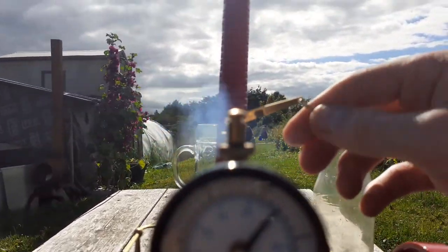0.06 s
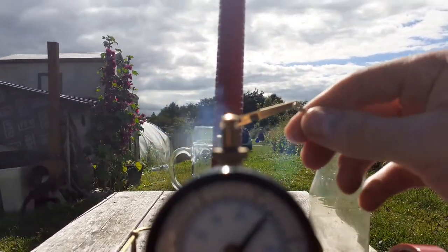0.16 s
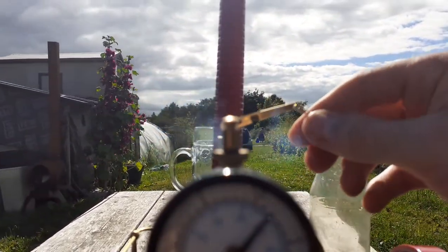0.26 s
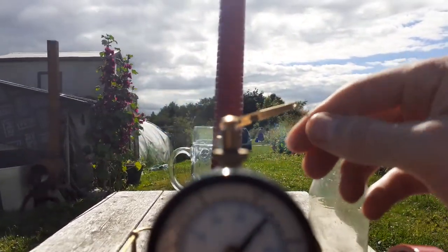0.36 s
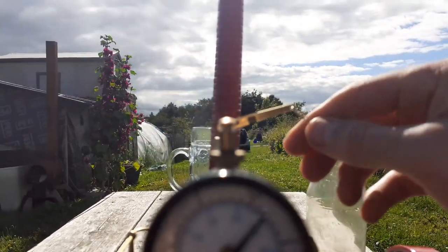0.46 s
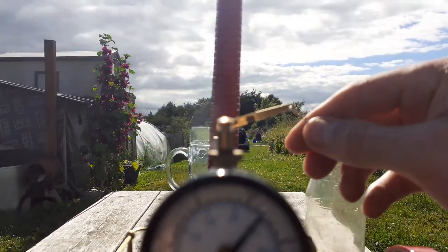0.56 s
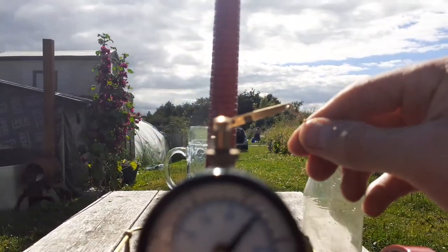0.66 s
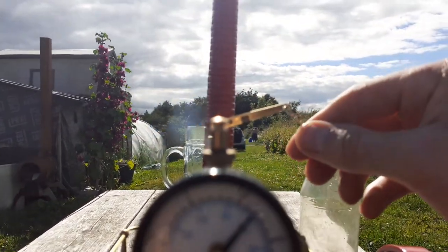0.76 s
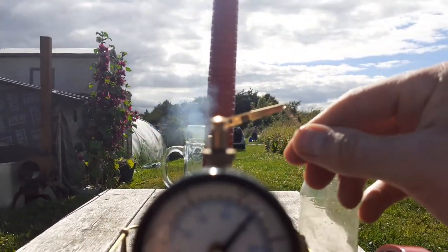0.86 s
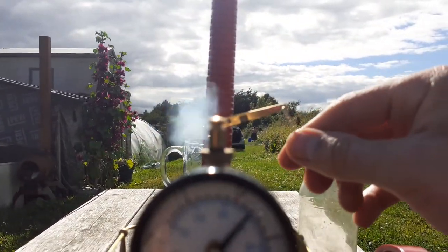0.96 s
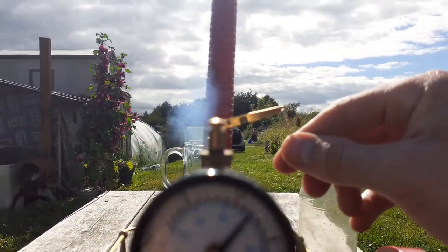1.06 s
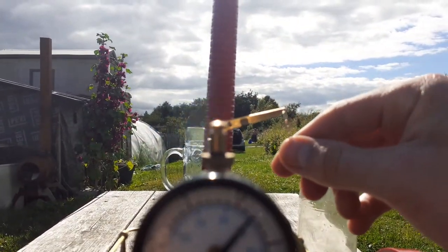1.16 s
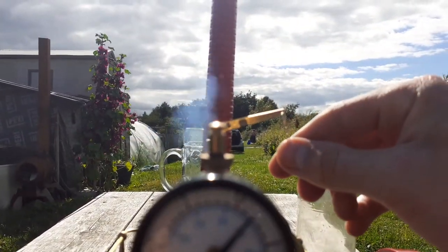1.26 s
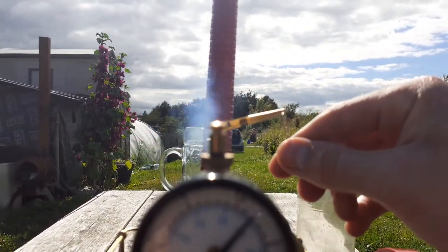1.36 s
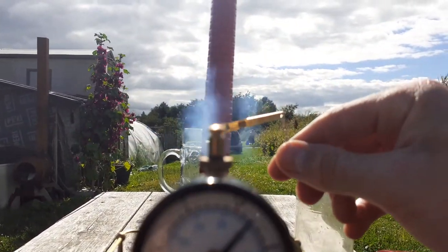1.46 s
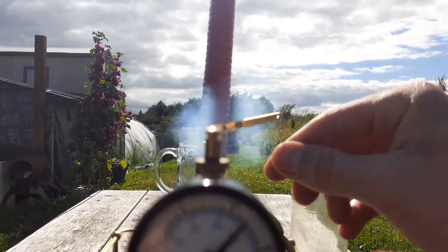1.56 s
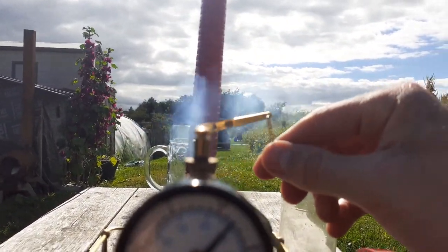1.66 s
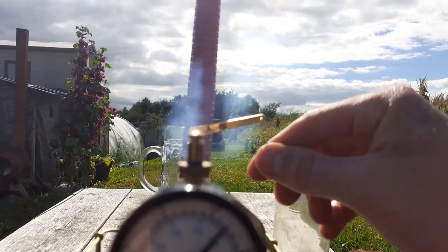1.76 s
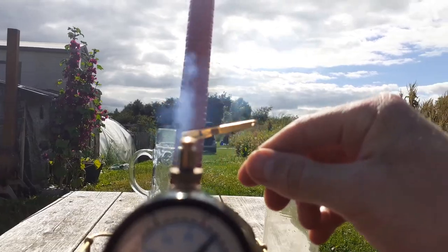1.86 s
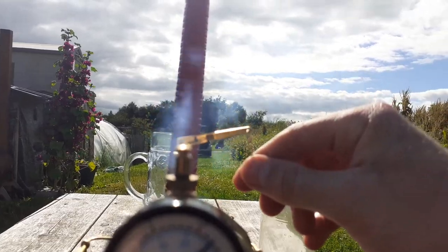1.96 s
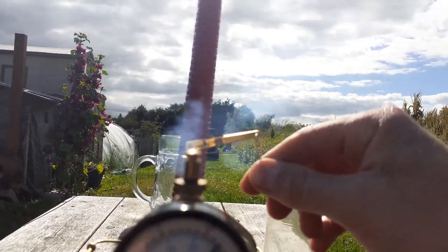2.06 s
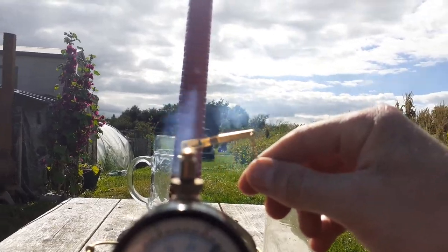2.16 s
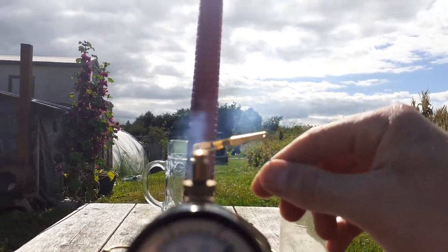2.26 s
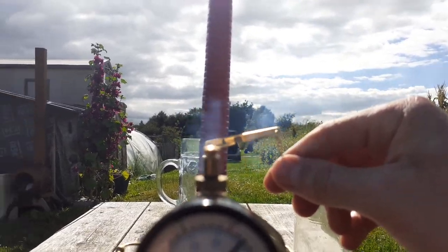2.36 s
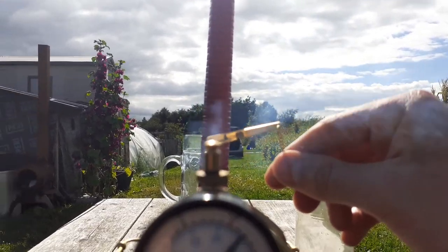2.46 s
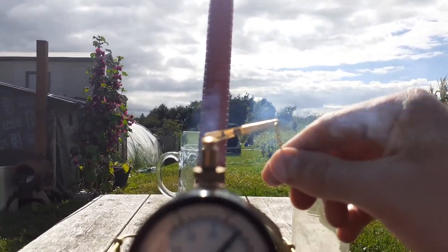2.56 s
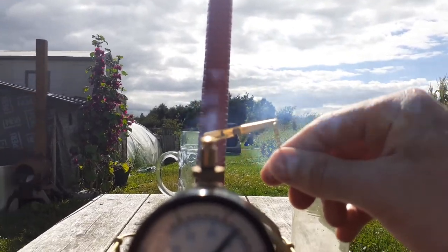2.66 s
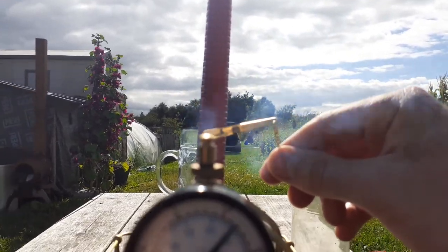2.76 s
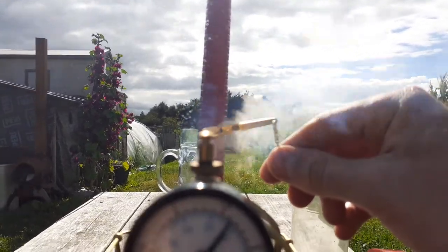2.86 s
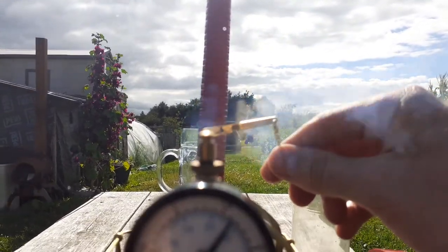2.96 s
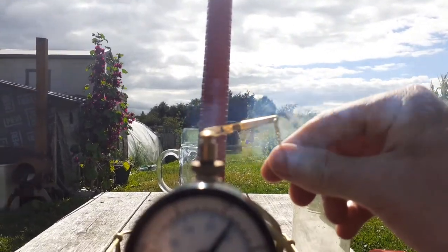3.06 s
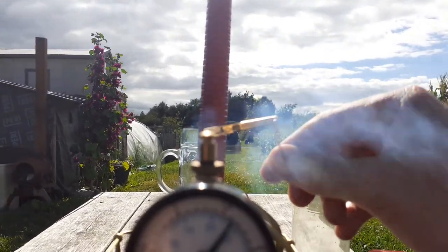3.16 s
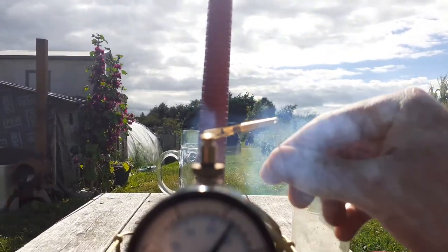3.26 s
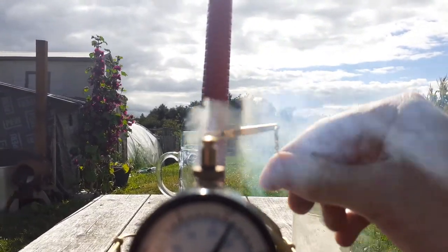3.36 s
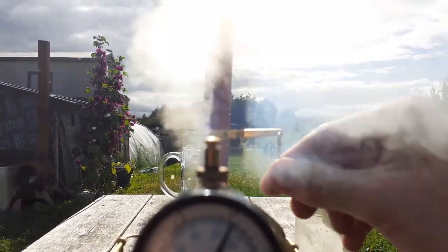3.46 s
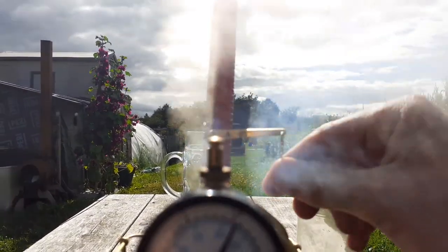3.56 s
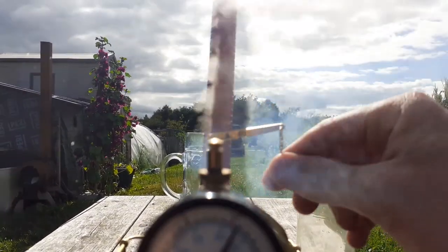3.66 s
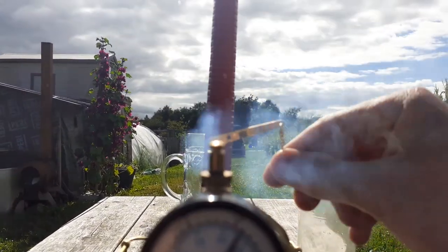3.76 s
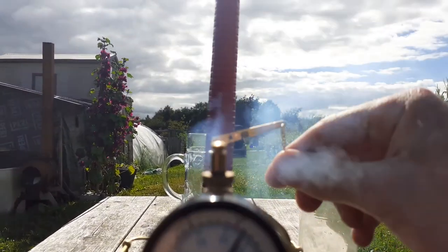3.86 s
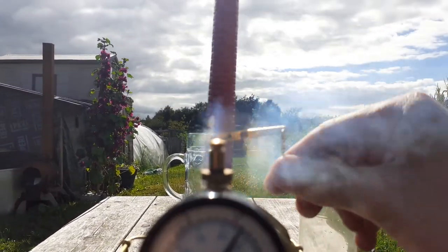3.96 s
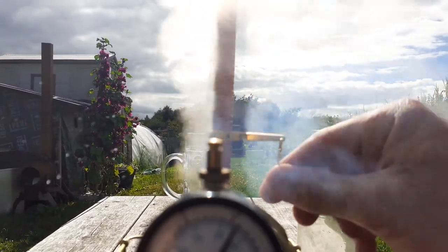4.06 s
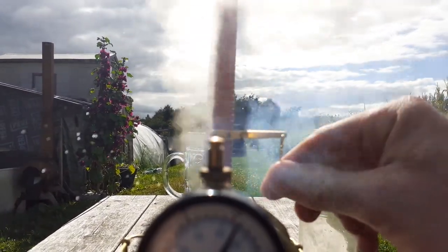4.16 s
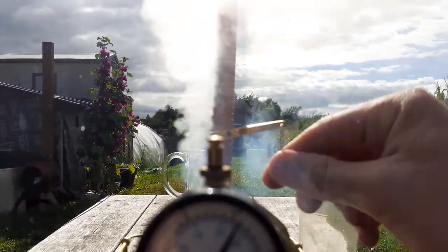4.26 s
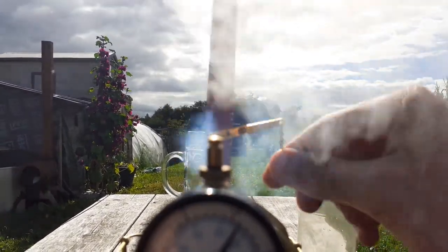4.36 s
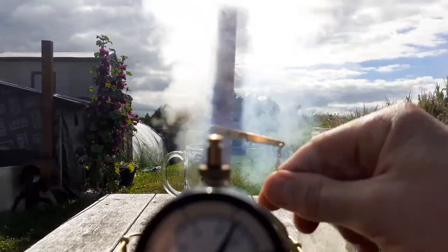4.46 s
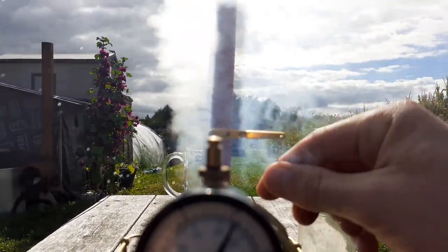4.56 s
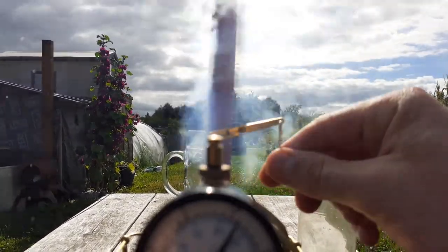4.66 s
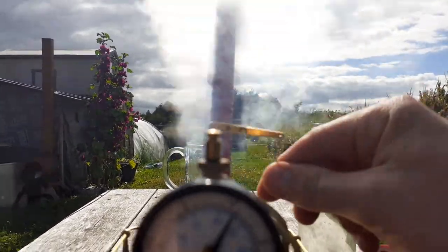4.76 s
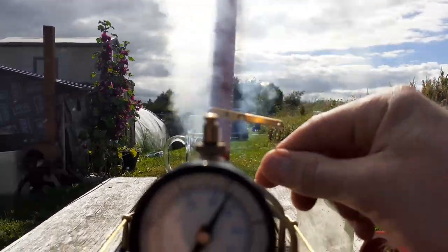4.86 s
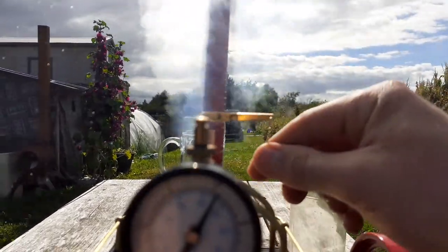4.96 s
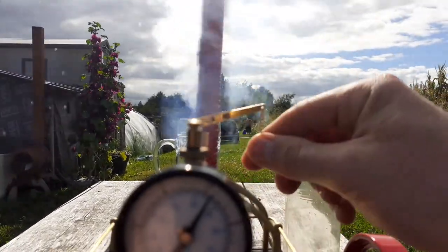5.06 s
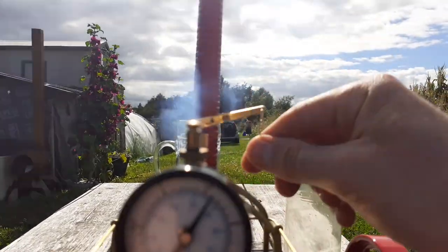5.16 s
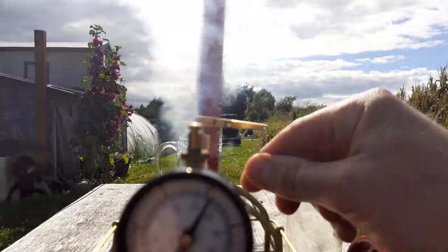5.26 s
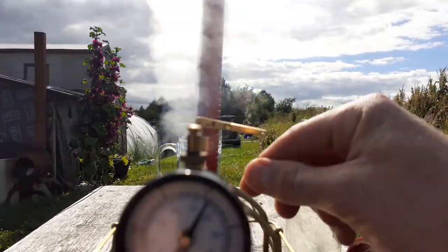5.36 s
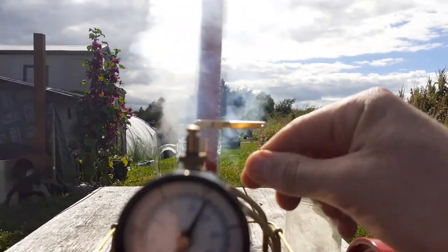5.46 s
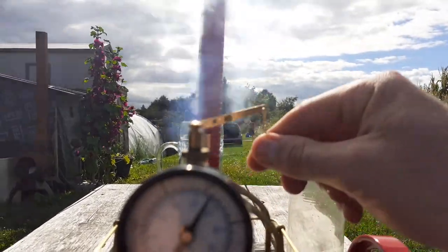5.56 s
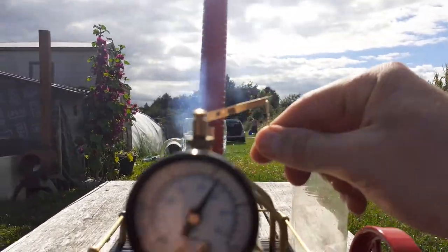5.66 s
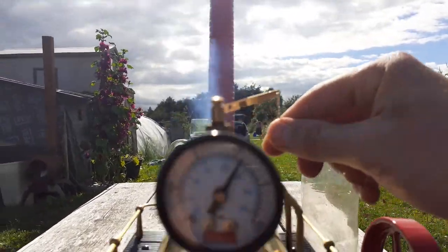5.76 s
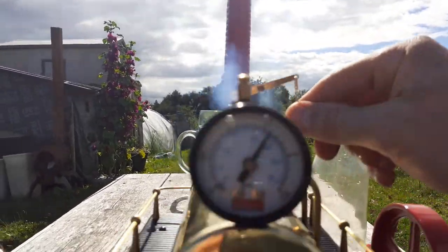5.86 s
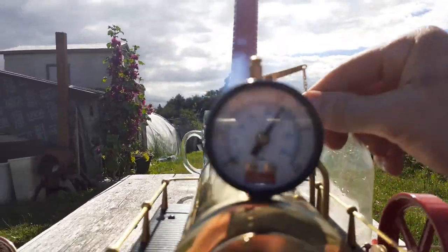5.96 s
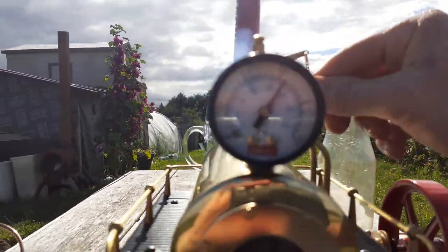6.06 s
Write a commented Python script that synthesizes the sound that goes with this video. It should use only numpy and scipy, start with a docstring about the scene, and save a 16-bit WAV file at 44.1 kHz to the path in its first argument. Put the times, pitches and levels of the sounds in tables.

```python
"""A small brass steam whistle on a model boiler in a garden, an arm's length from a phone, a little to its left.
From the start a hand rattles the valve chain (struck modes), a leak hisses (coloured noise) and a faint hum
drifts (two sines); then low gusts (slow noise) buffet mostly the left port and the valve spits wet steam (noise).
Five toots (sines with overtones) rise to pitch and sag again, each with jet hiss and a draught on the left port;
from the first toot on, leak, hum and chain are heard much lower."""
import sys
import numpy as np
from scipy import signal
from scipy.fft import rfft, irfft, next_fast_len
from scipy.io import wavfile
from scipy.ndimage import uniform_filter1d, map_coordinates

SR = 44100
rng = np.random.default_rng(int(sys.argv[2]) if len(sys.argv) > 2 else 0)


def to_wav(s):
    """Save 16-bit WAV."""
    ch = np.atleast_2d(s).T  # columns
    pcm = np.round(np.clip(ch, -1, 1) * 32767)  # PCM
    wavfile.write(sys.argv[1], SR, pcm.astype(np.int16))


def invert_db(level):
    """Linear amplitude ratio for a level in decibels (20 dB per decade), elementwise."""
    return 10 ** (np.asarray(level, dtype=float) / 20)


N = 269892


def column(table, k):
    """Linear interpolation: column k of a time curve at every sample."""
    rows = np.array(table, float)
    return np.interp(np.arange(N) / SR, rows[:, 0], rows[:, k])


def gate(start, end, fade_s=0.0027):
    """Trapezoidal envelope: rises from 0 at start and returns to 0 at end over fade_s."""
    t = np.arange(N) / SR
    return np.clip(np.minimum(t - start, end - t) / fade_s, 0, 1)


def at_hz(table, hz):
    """Logarithmic frequency scale: a (frequency, value) table is interpolated along it."""
    rows = np.array(table, float)
    return np.interp(np.log(hz + 1), np.log(rows[:, 0] + 1), rows[:, 1])


def walk(rate):
    """Low-passed randomness: levels held 1 / rate s and slewed twice; spread near 1."""
    held = max(int(SR / rate), 1)
    steps = np.repeat(rng.standard_normal(N // held + 1), held)
    return 1.81 * uniform_filter1d(uniform_filter1d(steps, held), held)[:N]


def pan(db):
    """Interaural level difference: left and right gains for left minus right in dB."""
    return invert_db(np.array([db, -db]) / 2)


def noise(spectrum, pan_db, alike, flicker_db, rate, lo_hz, hi_hz, lead=((0, 0), (1, 0))):
    """Filtered noise of partial coherence; octaves flicker alone. Before that, mean of sides has rms 1 in band."""
    size = next_fast_len(N)
    hz = np.arange(size // 2 + 1) * SR / size
    common, own = rfft(rng.standard_normal((2, size)), axis=1)
    alike = np.clip(alike, 0, 1)
    right = alike * common + np.sqrt(1 - alike ** 2) * own
    right = right * np.exp(-1j * at_hz(lead, hz))
    pair = np.array([common, right]) * invert_db(at_hz(spectrum, hz)) * pan(at_hz(pan_db, hz))
    inside = (hz > lo_hz) & (hz < hi_hz)
    pair = pair / np.sqrt(2 * np.sum(np.abs(pair.mean(0)[inside]) ** 2)) * size
    power = np.abs(pair[0]) ** 2
    out = np.zeros((2, N))
    for octave in range(5, 15):
        share = np.clip(1 - np.abs(np.log2(hz + 1) - octave), 0, 1)
        # octaves with next to no power are skipped
        if np.sum(share * power) > 1e-5 * np.sum(power):
            out += irfft(pair * share, size)[:, :N] * invert_db(flicker_db * walk(rate))
    return out


def ring(x, hz, t60):
    """Damped resonance: one mode excited by x, losing 60 dB in t60 seconds."""
    pole = np.exp(2j * np.pi * hz / SR - np.log(1000) / (t60 * SR))
    return signal.lfilter([1], [1, -pole], x).imag * np.sqrt(1 - abs(pole) ** 2)


def flow(opens, shuts, stroke_ms):
    """Blowing pressure sets pitch: its fractional sag while the valve opens and while it shuts."""
    t = np.arange(N) / SR
    stroke_s = stroke_ms / 1000
    opening = 0.33 * np.exp(np.clip((opens - t) / stroke_s, -50, 1))
    shutting = 0.27 * np.exp(np.clip((t - shuts) / stroke_s, -50, 1))
    return opening, shutting


# the valve's toots: open_s, shut_s, lever_stroke_ms, left_minus_right_db, port_draught_db
VALVE_TOOTS = [(3.425, 3.737, 25.2, 7.5, -49.5), (4.027, 4.332, 22.4, 6, -41.5),
               (4.464, 4.685, 11.4, 5, -37.5), (4.769, 5.104, 14, 5, -42), (5.258, 5.596, 12.7, 7, -40.5)]
# the tone at full pressure; waver and roughness are added to it: time_s, pitch_hz, level_db
TONE_CURVE = [(3.455, 4165, -11.5), (3.58, 4156, -13), (3.65, 4166, -13), (3.71, 4165, -15),
              (4.061, 4301, -11), (4.102, 4326, -10), (4.16, 4319, -12), (4.245, 4290, -11),
              (4.307, 4327, -12), (4.493, 4350, -11), (4.56, 4324, -14.5), (4.618, 4354, -14),
              (4.66, 4342, -11), (4.798, 4385, -10), (4.84, 4365, -12), (4.857, 4420, -12.5),
              (4.879, 4360, -14), (4.925, 4334, -14), (5.001, 4402, -11), (5.06, 4367, -11.5),
              (5.29, 4354, -14), (5.411, 4327, -16), (5.451, 4355, -15), (5.55, 4358, -14.5)]
# water drops choke the pipe: time_s, depth_db, length_ms
WATER_CHOKES = [(3.453, 10.5, 4), (3.507, 6, 4), (4.172, 22, 12), (4.862, 3.5, 1.7), (4.902, 12, 4.8),
                (5.382, 12, 6.4)]
# overtones at full pressure in calm draught: multiple, level_re_tone_db, left_lead_rad
OVERTONE_SERIES = [(2, -31.5, .1), (3, -16.5, 2.5)]
LOSS_DB, WET_LOSS_DB = 78, -1  # tone lost per unit of sag while opening; wet: steam already spits
LEAD_RAD, LEAD_RAD_PER_DB = .6, .165  # the further left the tone, the more the left leads
# the harder the draught above calm, the weaker each overtone
CALM_DB, BLUR_DB_PER_DB = -49.5, (0.9, 0.13)


def whistle():
    """Jet-driven pipe resonance: pitch follows pressure, turbulence roughens it, drops choke it."""
    t = np.arange(N) / SR
    choke_db = sum(depth * np.exp(-np.abs((t - s) / (ms / 2000)) ** 4) for s, depth, ms in WATER_CHOKES)
    rough = invert_db(.4 * walk(65) + 0.457 * walk(350) + .5 * walk(1200) - choke_db)
    choke_drop = .0004 * choke_db ** 2 * (1 + .5 * walk(400))  # a choked pipe drops in pitch
    waver = 1 + .0014 * walk(90) + 0.0025 * walk(500) - choke_drop
    out = np.zeros((2, N))
    for opens, shuts, stroke_ms, pan_db, draught_db in VALVE_TOOTS:
        opening, shutting = flow(opens, shuts, stroke_ms)
        sag = opening + shutting
        toot = [row for row in TONE_CURVE if opens < row[0] < shuts]
        phase = 2 * np.pi * np.cumsum(column(toot, 1) * (1 - sag) * waver) / SR
        lead = LEAD_RAD + LEAD_RAD_PER_DB * pan_db
        sides = pan(pan_db + .7 * walk(18) + 15 * sag)
        # the mean of the two sides keeps the tone's level
        sides = sides / np.abs(sides[0] + sides[1] * np.exp(1j * lead)) * 2
        loss_db = WET_LOSS_DB if opens < WET_SPIT[-1][0] else LOSS_DB
        # the tone weakens with pressure and dies quickly once the jet loses its grip on the pipe
        db = column(toot, 2) - loss_db * opening - 70 * shutting - 110 * np.maximum(sag - .17, 0)
        size = np.sqrt(2) * invert_db(db) * gate(opens + 0.0017, shuts + 0.0071, 0.0049) * rough
        tone = np.sin([phase, phase - lead])
        for (multiple, over_db, lag), blur in zip(OVERTONE_SERIES, BLUR_DB_PER_DB):
            # overtones need full pressure and fade first as it sags
            level_db = over_db - 32 * sag - blur * (draught_db - CALM_DB) + 1.5 * walk(25)
            tone += invert_db(level_db) * np.sin([multiple * phase, multiple * phase - lag])
        out += sides * size * tone
    return out


# wet steam around the valve's first opening: time_s, pipe_breath_db, jet_hiss_db
WET_SPIT = [(2.841, -70, -53), (2.86, -30, -28), (2.89, -32, -34.5), (3.04, -34, -42), (3.07, -45, -46),
            (3.37, -45.5, -47.5), (3.425, -32, -33), (3.5, -43, -50.5), (3.56, -60.5, -61)]
# the pipe blown without speaking: frequency_hz, density_db_per_hz
BREATH_SPECTRUM = [(1500, -29.5), (2600, -21), (3400, -10.5), (4400, -4), (4900, -3.5), (5500, -19),
                   (7000, -71)]
# the pipe nearly speaking: time_s, pitch_hz
MUTTER_PITCH = [(2.9, 4700), (3.05, 4230), (3.1, 4326), (3.42, 4420)]
# a slug of water clears the valve: start_s, length_s, level_db
WATER_PUFF = (2.842, 0.056, -20)
# sound of that slug: frequency_hz, density_db_per_hz
SLUG_SPECTRUM = [(590, -25), (1000, -16), (1970, -17), (2150, -16), (4330, 2), (6200, -28), (8060, -55),
                 (13600, -120)]
# hiss at the valve lip: frequency_hz, density_db_per_hz
JET_SPECTRUM = [(3650, -53), (6200, -7.5), (6600, -7), (7470, 1.5), (9260, -13.5), (10200, -5.5),
                (12100, 1.5), (14000, -2), (15200, -3), (16000, -3.5)]
# phase of the steam between the sides: frequency_hz, left_lead_rad
STEAM_LEAD = [(0, -6), (4400, 1.72), (6500, 5), (10000, 5), (14100, 10.5), (16000, 16)]
# the draught on the port: frequency_hz, density_db_per_hz
DRAUGHT_SPECTRUM = [(24, -47.5), (75, -2), (242, -3), (336, -2.5), (450, -2), (550, -2), (3100, -5.5),
                    (4030, -39), (6820, -120)]
JET_DB = -39  # hiss at the lip at full flow
FULL_FLOW_HZ, FULL_FLOW_DB = (12000, 14800), -3  # the jet is brighter in this band during toots
DRAUGHT_STROKES = 4.82  # the draught builds and dies over this many lever strokes


def steam():
    """Turbulent jet noise: steam hisses at the lip, blows across the pipe and shakes the left port."""
    spit_end = WET_SPIT[-1][0]
    spit = gate(WET_SPIT[0][0], spit_end)
    breath, hiss = invert_db(column(WET_SPIT, 1)) * spit, invert_db(column(WET_SPIT, 2)) * spit
    draught, full = 0, 0
    # the pipe nearly speaks: a narrow unsteady band that slides in pitch
    carrier = np.exp(2j * np.pi * np.cumsum(column(MUTTER_PITCH, 1)) / SR)
    mutter = carrier * (walk(380) + 1j * walk(380))
    mutter = np.array([mutter, mutter * np.exp(-1.7j)]).real
    mutter = invert_db(-2.5) * breath * pan(5.7)[:, None] * mutter
    for opens, shuts, stroke_ms, _, draught_db in VALVE_TOOTS:
        sag = sum(flow(opens, shuts, stroke_ms))
        jet = invert_db(JET_DB - 16.6 * np.sqrt(sag)) * gate(opens - .022, shuts + 0.023, .016)
        hiss, breath, full = hiss + jet, breath + invert_db(4.0) * jet, full + invert_db(FULL_FLOW_DB) * jet
        # where steam already spits, the draught starts earlier
        starts = opens if opens > spit_end else opens - .1
        blow = gate(starts, shuts + 0.0067, DRAUGHT_STROKES * stroke_ms / 1000) ** 1.59
        draught = draught + invert_db(draught_db) * blow
    s, length, puff_db = WATER_PUFF
    puff = invert_db(puff_db) * gate(s, s + length, 0.024)
    lip = noise(JET_SPECTRUM, [(6000, 1.0), (15000, 7.9)], 0.593, 1.4, 40, 13660, 16220, STEAM_LEAD)
    bright = signal.sosfilt(signal.butter(2, FULL_FLOW_HZ, "bandpass", fs=SR, output="sos"), lip)
    pipe = noise(BREATH_SPECTRUM, [(1500, 7.1), (5000, 4.2)], 0.37, 2.7, 60, 2500, 5800, STEAM_LEAD)
    slug = noise(SLUG_SPECTRUM, [(1500, 8.3), (5000, 4.9)], 1.0, 0.7, 150, 2500, 5800, STEAM_LEAD)
    buffet = noise(DRAUGHT_SPECTRUM, [(100, 19), (700, 25.4), (2400, 23)], .15, 0.84, 40, 150, 2200)
    buffet = invert_db(2.38 * walk(60) + 0.45 * walk(13)) * buffet
    return mutter + hiss * lip + full * bright + breath * pipe + puff * slug + draught * buffet


HUSH_DB, HUSH_S = -16, 0.095


def hush():
    """Gain ramp in decibels: the faint sounds sink as the first toot begins and stay down."""
    since = np.arange(N) / SR - VALVE_TOOTS[0][0]
    return invert_db(HUSH_DB * np.clip(since / HUSH_S, 0, 1))


# chain and lever knocks, early and around the toots; hush() lowers the later ones from these levels:
# start_s, body_peak_db, brightness_db
CHAIN_KNOCKS = [(0.065, -23, -2), (0.151, -16.5, -21), (0.185, -24.5, -11), (0.258, -17, -2),
                (.36, -32, -7), (.628, -36.5, -7), (.945, -41, -12), (1.045, -34, -7), (1.119, -24, -13),
                (1.185, -19, -2.5), (1.511, -35, -7), (1.72, -26.5, -10), (1.764, -33.5, -9),
                (2.057, -31.5, -16), (2.286, -23.5, -14), (2.464, -32.5, -20), (2.508, -22.5, -1.5),
                (2.606, -20.5, -16), (2.629, -21.5, -17), (2.728, -20, -2), (3.653, -15, -21),
                (4.692, -21, -25), (5.113, -18.5, -23), (5.147, -19.5, -20), (5.227, -20, -4.5),
                (5.85, -33.5, -8)]
# modes of the boiler fittings: frequency_hz, gain_db, t60_s
FITTING_MODES = [(745, -3.5, 0.036), (950.5, -0.5, 0.0513), (1099, -3, 0.15), (1298, 1.5, 0.068),
                 (1650, -7.5, 0.033), (1735, 1, 0.05), (1852, -4.5, 0.056), (2320, -14.5, 0.14),
                 (2715, 7, 0.029), (3290, 10.5, 0.043), (4100, 5.5, .018), (4700, 9, 0.014),
                 (7080, 9.5, 0.0029), (15100, -18, .004)]
SCRAPE_RISE_S, SCRAPE_FALL_S = 1.42 / 1000, 13.9 / 1000
# faint ticks of single links fall at random while the hand plays with the chain
TICKS, TICKS_END_S = 45, 2.8
TICK_DB, TICK_SPREAD_DB, TICK_BRIGHT_DB = -40, 2.24, -22  # the softest tick; exponential spread above it
SPLIT_HZ = 2400  # modes below make the body of a knock, the others its edge


def chain():
    """Modal excitation: gritty scrapes are heard directly and through fittings struck by luck."""
    out, length = np.zeros((2, N + 8192)), 3600
    t = np.arange(length) / SR
    body = signal.butter(2, [700, 2600], "bandpass", fs=SR, output="sos")
    edge = signal.butter(1, [2500, 7500], "bandpass", fs=SR, output="sos")
    cut = signal.butter(3, 600, "highpass", fs=SR, output="sos")
    push = np.clip(t / SCRAPE_RISE_S, 0, 1) ** 2
    push = push * np.exp(-(np.maximum(t - SCRAPE_RISE_S, 0) / SCRAPE_FALL_S) ** 2)
    ticks = [(a * TICKS_END_S, TICK_DB - TICK_SPREAD_DB * np.log(1 - b), TICK_BRIGHT_DB)
             for a, b in rng.random((TICKS, 2))]
    for s, db, bright_db in CHAIN_KNOCKS + ticks:
        grit = rng.standard_normal((2, length))
        # the right side hears a little of the left, six samples later
        scrape = push * np.array([grit[0], 0.37 * np.roll(grit[0], 6) + 1.16 * grit[1]])
        luck = 3.0 * rng.standard_normal(len(FITTING_MODES))
        low, high = 0, 0
        for (hz, gain_db, t60), luck_db in zip(FITTING_MODES, luck):
            mode = invert_db(gain_db + luck_db) * ring(scrape, hz, t60)
            if hz < SPLIT_HZ:
                low = low + mode
            else:
                high = high + mode
        direct_low, direct_high = signal.sosfilt(body, scrape), signal.sosfilt(edge, scrape)
        low = low / np.std(low) + 1.13 * direct_low / np.std(direct_low)
        high = high / np.std(high) + 1.26 * direct_high / np.std(direct_high)
        # the level is the peak of the body of the knock
        knock = (low + invert_db(bright_db) * high) * pan(6.5)[:, None] / np.max(np.abs(low.mean(0)))
        start = int(s * SR)
        out[:, start:start + length] += invert_db(db) * knock
    # under the knocks the links jiggle faintly, following the background level
    jiggle_db = 3.7 * walk(60) + 3.7 * walk(5.3) + column(BACKGROUND_LEVEL, 1) - 21.5
    jiggle = rng.standard_normal((2, N)) * invert_db(jiggle_db) * np.sqrt(hush()) * pan(11.0)[:, None]
    jiggle = sum(invert_db(g) * ring(jiggle, hz, t60) for hz, g, t60 in FITTING_MODES if hz < SPLIT_HZ)
    return signal.sosfilt(cut, out[:, :N] + jiggle)


# gusts: time_s, level_db
WIND_LEVEL = [(0, -75), (2.2, -67), (2.3, -45), (2.38, -56.5), (2.44, -33), (2.65, -46.5), (2.76, -41),
              (3.27, -37.5), (3.35, -57), (3.43, -45.5), (3.501, -75), (6.12, -84.5)]
# colour of the gusts: frequency_hz, density_db_per_hz
GUST_SPECTRUM = [(18, -54.5), (30, -21), (68, 2.5), (91, 2.5), (233, -13), (327, -15), (500, -31.5),
                 (650, -55), (1100, -120)]


def wind():
    """Turbulent pressure: low gusts buffet the ports, mostly the left, with little coherence."""
    gusts = noise(GUST_SPECTRUM, [(50, 16), (300, 8)], 0.19, 3.1, 22, 40, 200)
    return invert_db(column(WIND_LEVEL, 1)) * gate(WIND_LEVEL[0][0], WIND_LEVEL[-1][0], 0.046) * gusts


# the hum throughout; waver, flicker and hush() then act on these values: time_s, pitch_hz, level_db
HUM_CURVE = [(0, 425, -55.5), (.45, 415.7, -61), (1.2, 402.3, -76), (2.7, 421.5, -59), (3, 426.3, -62.5),
             (5.45, 432, -70), (5.6, 441, -61), (6.12, 455.6, -59)]


def hum():
    """Frequency modulation: a faint drifting hum, perhaps an insect's wings, with a weaker tone at half pitch."""
    phase = 2 * np.pi * np.cumsum(column(HUM_CURVE, 1) * (1 + 0.0068 * walk(28))) / SR
    level = np.sqrt(2) * invert_db(column(HUM_CURVE, 2) + 1.6 * walk(8.7))
    return level * (np.sin(phase) + invert_db(-5.5) * np.sin(phase / 2))


# colour of leak and garden air: frequency_hz, density_db_per_hz
LEAK_SPECTRUM = [(24, -43), (40, -16.5), (220, -6), (305, -4.5), (402, -7), (479, -8), (663, -5),
                 (1720, -8.5), (5310, -4.5), (6170, -8.5), (7360, -0.5), (8990, -16), (12300, -1),
                 (14500, 2), (16000, -0.5)]
# its side: frequency_hz, left_minus_right_db
LEAK_SIDES = [(60, 7.5), (110, 5), (200, 5.5), (380, 2.5), (700, 1), (1290, 8.5), (2380, 14.5), (4400, 6),
              (8120, 3), (15000, 5.5)]
# its phase: frequency_hz, left_lead_rad
LEAK_PHASE = [(0, -1.5), (690, -0.55), (2000, 1), (3500, 5), (6800, 3.5), (16000, 9.5)]
# its level throughout, which hush() then lowers: time_s, level_db
BACKGROUND_LEVEL = [(0, -39.5), (.6, -43.5), (1.4, -41), (5.2, -39.5), (5.7, -43), (6.12, -41)]
# the leak is heard again off the moving hand, which shifts the colour of its treble
HAND_DB, HAND_LAG_MS, HAND_SWAY_MS, HAND_HZ = -15, .45, 0.046, 9000


def background():
    """Comb filtering: a steady leak over garden air meets a drifting reflection of its own treble."""
    leak = noise(LEAK_SPECTRUM, LEAK_SIDES, 0.61, 0.57, 8.2, 91, 15000, LEAK_PHASE)
    treble = signal.sosfilt(signal.butter(2, HAND_HZ, "highpass", fs=SR, output="sos"), leak)
    place = np.arange(N) - (HAND_LAG_MS + HAND_SWAY_MS * walk(1.7)) * SR / 1000
    reflection = np.array([map_coordinates(side, [place]) for side in treble])
    return invert_db(column(BACKGROUND_LEVEL, 1)) * (leak + invert_db(HAND_DB) * reflection)


ECHO_DB, ECHO_S = -48, .035


def scene():
    """Superposition: all sources in the open air, and one faint echo of the whistle from a shed wall."""
    toots = whistle()
    lag = int(ECHO_S * SR)
    # the echo arrives with its sides swapped
    echo = invert_db(ECHO_DB) * np.pad(toots, ((0, 0), (lag, 0)))[::-1, :N]
    faint = hush() * (background() + hum() + chain())
    return toots + echo + steam() + wind() + faint


def top_cut(x):
    """Nothing passes above the cut-off."""
    return signal.sosfilt(signal.butter(12, 17090, fs=SR, output="sos"), x)


def record(dry):
    """Saturation and band limiting: the phone rounds the loudest peaks and cuts the top of the band."""
    top = signal.ellip(12, .2, 70, 15780, fs=SR, output="sos")
    rounded = 1.34 * np.tanh(dry / 1.285)
    mix = signal.sosfilt(top, rounded)
    return top_cut(mix)


dry = scene()
out = record(dry)
to_wav(out)
```